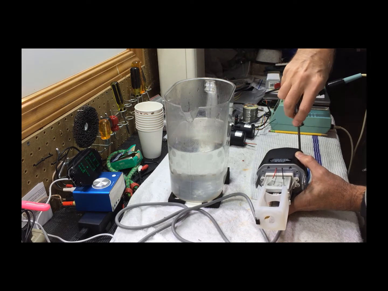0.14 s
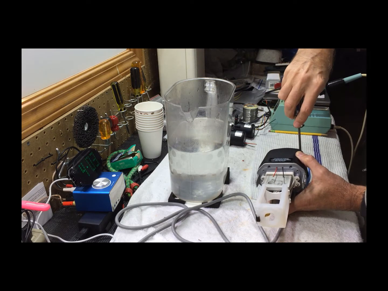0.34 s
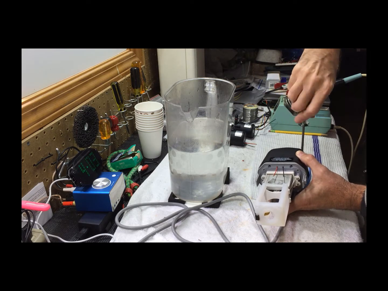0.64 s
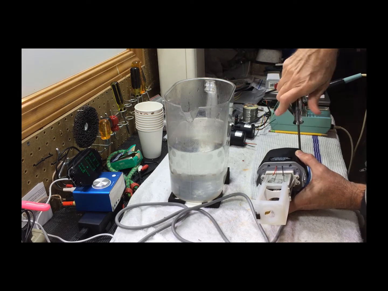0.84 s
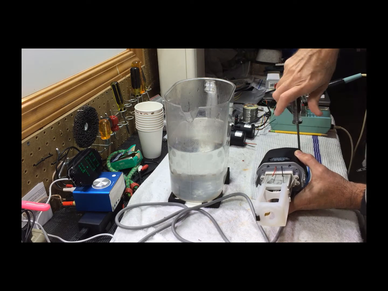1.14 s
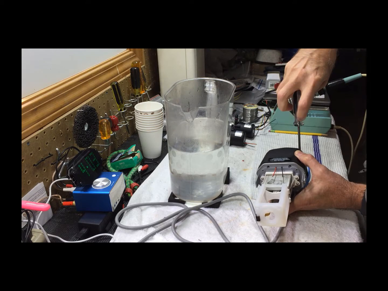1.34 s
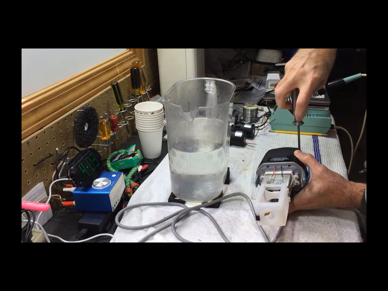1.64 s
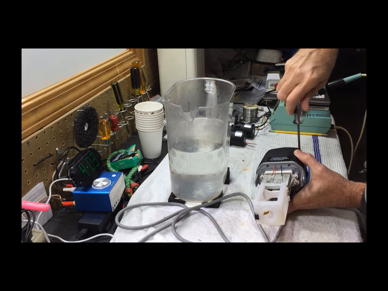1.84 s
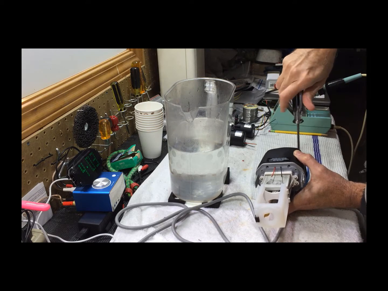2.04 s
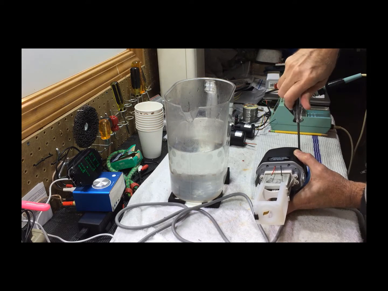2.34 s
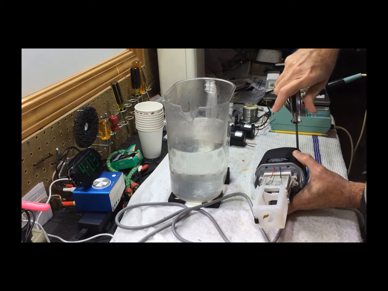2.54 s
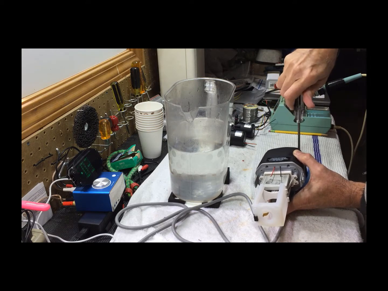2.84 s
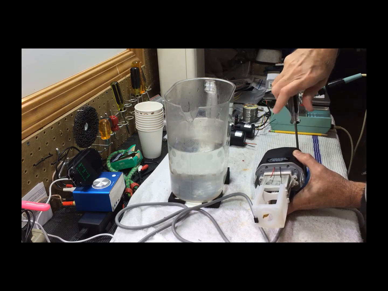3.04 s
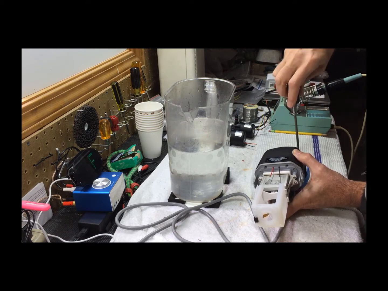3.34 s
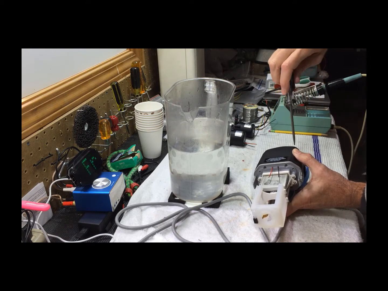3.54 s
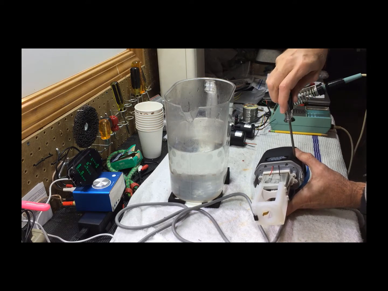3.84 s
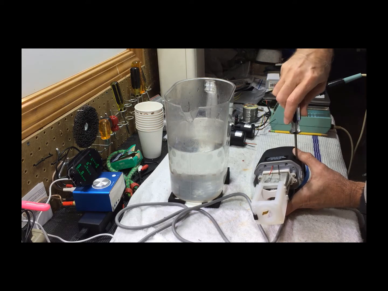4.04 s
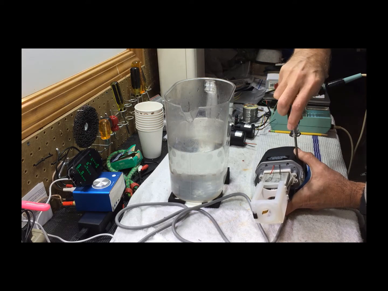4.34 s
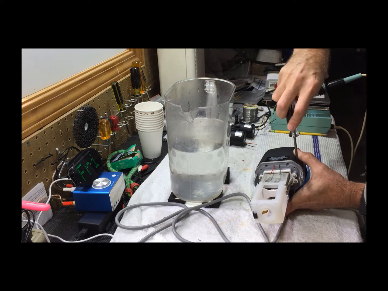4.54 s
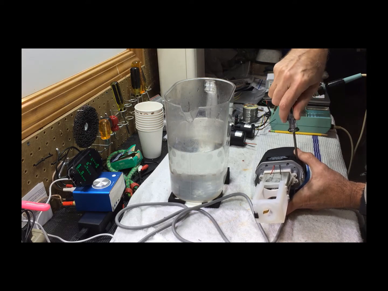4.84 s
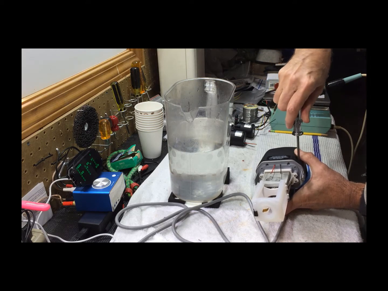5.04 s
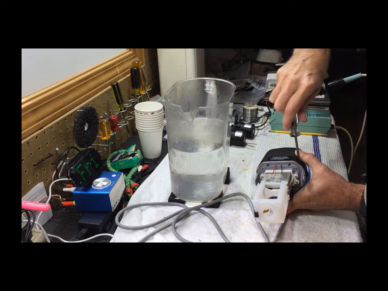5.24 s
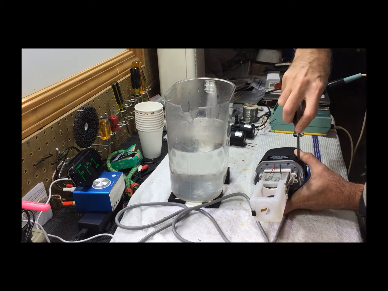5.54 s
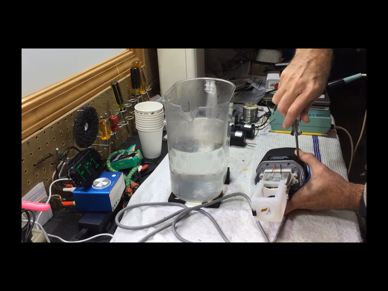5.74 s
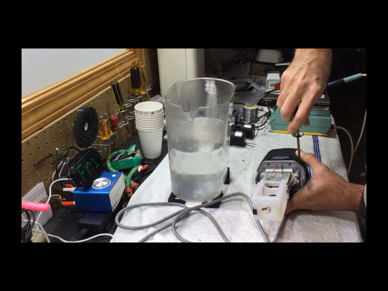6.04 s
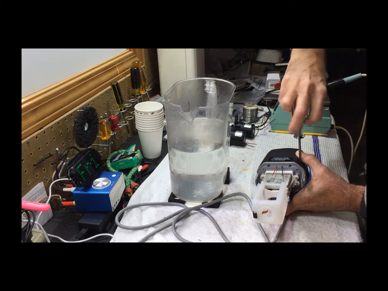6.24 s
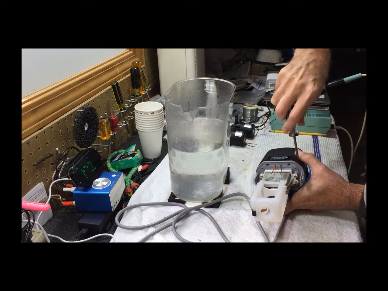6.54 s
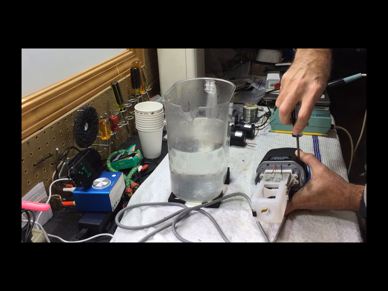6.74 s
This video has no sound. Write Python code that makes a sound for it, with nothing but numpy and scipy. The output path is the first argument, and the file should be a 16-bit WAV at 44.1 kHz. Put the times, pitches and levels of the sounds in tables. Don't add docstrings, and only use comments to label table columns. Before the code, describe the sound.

A small steel screwdriver works at screws in a hollow plastic housing held on a cloth-covered bench, close to the microphone. It opens at once with a short rub and crisp clicks, and a hard double knock at about 0.35 s, with smaller taps to 0.8 s. From 0.8 to 2.2 s only sparse, light plastic ticks. From 2.2 to 3.5 s a soft rub fades under denser rattling, with a firmer knock near 3.1 s. After a short lull, knocks cluster from 4.0 to 4.5 s, strongest at 4.25 s. Quiet again, then a rising scrape and the heavy clacks at 5.1 and 5.25 s, with smaller ones to 5.6 s. From 5.8 s a rub grows beneath uneven ticks and knocks, ending with a tap near 6.75 s. Sounds are dry and midrange with bright metallic edges, a short small-workshop echo, faint steady hiss and low rumble.

```python
import sys
import numpy as np
from scipy import signal
from scipy.fft import rfft, irfft
from scipy.io import wavfile

SR = 44100
rng = np.random.default_rng(int(sys.argv[2]) if len(sys.argv) > 2 else 0)


def persist_wave(psi):
    counts = np.round(np.clip(psi, -1, 1) * 32767).astype(np.int16)
    wavfile.write(sys.argv[1], SR, np.atleast_2d(counts).T)


def attenuation_scalar(level_db):
    decades = np.asarray(level_db, float) / 20
    return 10 ** decades


N = 303408

# pitch_hz, density_db
AIR_SPECTRUM = [(15, -31), (25, -57), (76, 2.5), (463, -5), (641, -9), (1840, -10.5), (9070, -19.5),
                (15300, -22.5)]
# time_s, level_db
AIR_LEVEL = [(0, -68), (1, -71.5), (2, -69.5), (3, -67), (3.8, -68.5), (4.7, -66.5), (5.8, -70), (6.9, -69)]
# time_s, level_db
RUMBLE_LEVEL = [(0, -78.5), (1.5, -81.5), (3.2, -78.5), (4.7, -76.5), (6.9, -77)]

# pitch_hz, level_db, t60_s
HOLLOW_MODES = [(493, -11, 0.097), (600, 0.5, 0.12), (635, 4, 0.045), (710, 0.5, 0.045)]
# pitch_hz, level_db, t60_s
WALL_MODES = [(888, -24.5, 0.072), (1094, -3.5, 0.054), (1210, -4.5, 0.086), (1465, -0.5, 0.03)]
# pitch_hz, level_db, t60_s
RIB_MODES = [(1467, -1, 0.02), (1628, 2.5, 0.029), (1697, 6, 0.036), (2004, 1.5, 0.02), (2210, -12, 0.03)]
# pitch_hz, level_db, t60_s
LONG_RIB_MODES = [(1930, -6, 0.044), (2600, -7.5, 0.029)]
# pitch_hz, level_db, t60_s
POST_MODES = [(2540, -5.5, 0.0031), (2760, 0, 0.02), (2950, 4, 0.0083), (3280, -3, 0.036),
              (4520, -8.5, 0.0098), (4164, -2.5, 0.051), ]
# pitch_hz, level_db, t60_s
STEEL_MODES = [(3370, 2, 0.014), (4640, -12.5, 0.0047), (5483, 0.5, 0.036), (6440, -1.5, 0.049),
               (7740, -8, 0.0036), (8720, -8.5, 0.098)]
# pitch_hz, level_db, t60_s
TIP_EDGE_MODES = [(10000, 0.19, 0.0065), (11800, 0.067, 0.018), (14450, -0.82, 0.0019)]
# pitch_hz, level_db, t60_s
BENCH_MODES = [(172, -19, 0.07), (243, -8.5, 0.062), (321, 1.5, 0.12)]

# start_s, end_s, start_db, end_db
RUBS = [
    (0, 0.047, -70, -54.5),
    (2.195, 3.42, -71.5, -91),
    (3.959, 4.17, -63.5, -61.5),
    (4.984, 5.256, -70.5, -52),
    (5.894, 6.613, -88, -64.5),
]
# start_s, level_db
TIP_CLICKS = [(0.0005, -50.5), (0.0291, -43), (0.3434, -63), (0.367, -43.5), (0.3693, -35), (0.607, -64),
              (0.618, -48), (0.6264, -51.5), (0.646, -58.5), (0.842, -69), (2.4344, -52), (2.5806, -48),
              (2.8, -57), (2.846, -48), (1.4735, -70), (3.006, -53.5), (1.577, -71), (3.1176, -70),
              (3.126, -43.5), (3.137, -55), (3.145, -52), (3.277, -50), (3.266, -63), (3.3744, -51),
              (3.413, -63), (3.424, -56), (3.441, -55), (3.461, -51), (3.476, -47.5), (3.4937, -56),
              (3.9738, -56.5), (3.984, -56), (4.1094, -48), (4.2525, -52.5), (2.009, -87),
                    (4.4441, -67), (4.4584, -63), (5.09, -44), (5.212, -55), (5.2206, -41.5), (5.224, -54),
                    (5.2718, -27.5), (5.5255, -58), (5.581, -57), (5.5875, -62), (5.948, -43),
                    (6.4155, -59), (5.9866, -68), (5.9987, -49), (6.024, -62), (6.2907, -57), (6.317, -61),
                    (6.308, -65), (6.3976, -47.5), (6.38, -64)]
# time_s, level_db
TIP_BITE = [(0, -9.5), (2, -1), (3.4, -1), (3.5, -51), (5, -8), (5.3, -8.5), (6.9, -23)]

# start_s, case_db, rattle_ms
CASE_KNOCKS = [(0.3429, -28.5, 9.3), (.3465, -54, 6.2), (.5287, -57, 3.8), (.5454, -57.5, 13),
               (0.6029, -35, 3.5), (1.1686, -43, 3.8), (1.321, -53.5, 2.5), (1.748, -59, 8.5),
               (2.2846, -52, 11.3), (4.2104, -45.5, 3.7), (4.2364, -46, 2.8), (4.9094, -57.5, 7.3),
               (6.3495, -53, 3), (6.4761, -52, 4), (6.506, -57, 6.5), (6.6044, -56.5, 7.3)]
# start_s, spot_db, case_db, rattle_ms
WALL_KNOCKS = [(.4766, -58, -52, 11.4), (.6444, -57, -55, 2.5), (.9194, -62, -63.5, 2.24),
               (1.075, -67.5, -66, 12), (1.401, -58, -61.5, 3), (2.0183, -58, -50.5, 11),
               (2.0366, -55.5, -48.5, 8.5), (2.4826, -68, -64, 19), (2.4885, -50, -52, 2.9),
               (3.1253, -47, -33, 2.7), (3.3432, -61, -61, 12), (3.9829, -42, -56.5, 9.6),
               (4.081, -56, -80, 18), (4.0906, -51.5, -58, 5.6), (4.1933, -48, -52, 0.48),
               (4.2542, -33, -38, 1.5), (4.4123, -55.5, -71, 7.4), (4.4591, -42, -39, 5.7),
               (5.2123, -41, -43, 7.8), (5.2185, -32.5, -60, 8.1), (5.4294, -47, -52, 3.5),
               (5.5795, -50, -49, 8), (6.0234, -47, -43.5, 4.4), (6.3011, -44.5, -54, 0.89),
               (6.3427, -52, -53, 2.3), (6.3691, -49.5, -45, 1.36), (6.5117, -51.5, -79, 12),
               (6.529, -44.5, -43.5, 6.5)]
# start_s, spot_db, case_db, rattle_ms
RIB_TICKS = [(.4985, -56.5, -52.5, 13), (1.1625, -53.5, -83, 6.8), (1.473, -46.5, -46, 1.9),
             (1.5961, -61, -55, 3), (1.7683, -49, -53.5, 5.7), (1.8545, -57, -55.5, 1.26),
             (2.0445, -60.5, -71, 3), (2.1466, -58, -61.5, 3.1), (2.312, -56, -58, 1.8),
             (2.5626, -47.5, -49, 2.35), (2.724, -56, -69, 1.8), (2.757, -51, -60, 4.4),
             (2.9818, -50.5, -57, 3.9), (3.0134, -62, -68, 6.8), (3.25, -47.5, -52.5, 15),
             (3.366, -60, -71, 2.2), (3.3724, -48.5, -51, 6.6), (3.4397, -42, -50, 6.9),
             (3.9744, -43, -54.5, 1.06), (4.1107, -35, -83, 5.3), (4.2051, -47, -43, 6.2),
             (4.4361, -48.5, -43, 14), (5.6753, -64, -51.5, 5), (5.95, -36.5, -54.5, 3.4),
             (6.29, -44.5, -41, 3.6), (6.3977, -51, -58, 8.6), (6.428, -51.5, -55, 1.6),
             (6.4476, -70, -58, 3.5), (6.553, -75, -56, 18), (6.6227, -73, -59.5, 13)]
# start_s, spot_db, case_db, rattle_ms
CORNER_KNOCKS = [(.0005, -40.5, -37, 3.8), (.7175, -51.5, -54, 2.7), (.7523, -59.5, -58, 3.6),
                 (.7925, -61, -60.5, 2.9), (1.5755, -55.5, -52, 1.66), (1.9105, -67, -61.5, 6.8),
                 (2.3617, -80, -62.5, 5.7), (2.4251, -58, -54.5, 2.3), (2.434, -51, -55.5, 1),
                 (2.5772, -46.5, -46, 14), (2.8431, -48.5, -39.5, 2.8), (3.0925, -50, -66, 15),
                 (4.0325, -55, -80, 3.5), (4.0585, -53, -63, 10.3), (4.427, -56, -54, 29),
                 (4.4441, -42.5, -61, 1.5), (4.9498, -58, -63, 7.5), (5.0762, -58, -47, 9.7),
                 (5.0904, -26, -27, 3.35), (5.5242, -42.5, -38, 6.5), (5.8416, -67, -58.5, 3.1),
                 (5.8641, -55, -50.5, 5.4), (5.969, -50, -66, 5.9), (5.9864, -42, -44.5, 3.2),
                 (5.9995, -40, -36.5, 4.46), (6.3093, -39.5, -49.5, 3.9), (6.4395, -57, -57, 4.8),
                 (6.5222, -56, -55, 3.2), (6.538, -52, -46, 1.78), (6.768, -41.5, -39, 1.83)]
# start_s, spot_db, case_db, rattle_ms
POST_TICKS = [(.0284, -30.5, -31, 2.15), (.3678, -28, -23.5, 3.36), (.5997, -50, -73, 5),
              (.6261, -56, -60, 6.7), (.7299, -70.5, -58.5, 10.5), (1.1991, -57.5, -74.5, 3.4),
              (1.6992, -62.5, -63, 3.4), (1.947, -65, -94, 5), (2.0066, -51.5, -53.5, 3.3),
              (2.2945, -49, -60.5, 2.5), (2.8008, -48, -62, 3.2), (2.826, -53, -49, 21.4),
              (3.0058, -56, -49, 5.6), (3.12, -51, -69, 7.7), (3.1375, -48, -74.5, 1.8),
              (3.1463, -54, -47.5, 3), (3.2776, -44.5, -42.5, 4.94), (3.3354, -58.5, -75, 3.9),
              (3.4263, -56, -67, 12), (3.4625, -41.5, -52, 2.6), (3.476, -47, -75, 5.7),
              (3.4922, -44, -56, 1.75), (3.509, -61, -82, 5.7), (5.0658, -61, -59, 11),
              (5.1991, -54, -55, 8.4), (5.224, -40.5, -38, 5.5), (5.2707, -31.5, -36, 5.2),
              (5.2675, -42.5, -60, 2.94), (5.5862, -49, -57, 6.6), (5.8297, -57, -69, 2.3)]
# walls_db, ribs_db, posts_db, long_rib_db, steel_db
CASE_SHARES = (-11.5, -10, -18, -39.5, -30)
# walls_db, ribs_db, posts_db, long_rib_db, steel_db
WALL_SHARES = (-1.2, -2, -10.5, -52, -26.5)
# walls_db, ribs_db, posts_db, long_rib_db, steel_db
RIB_SHARES = (-9.5, -3, -6, -1.5, -23)
# walls_db, ribs_db, posts_db, long_rib_db, steel_db
CORNER_SHARES = (0.8, -3.5, -9.5, -0.5, -18)
# walls_db, ribs_db, posts_db, long_rib_db, steel_db
POST_SHARES = (-1, -0.5, 0.5, -29, -15.5)

# start_s, pitch_hz, level_db
CASE_NOTES = [(0.0005, 970, -37), (0.001, 680, -58), (0.031, 630, -34), (0.0314, 1227, -30.5),
              (0.3529, 604, -31), (0.3673, 974, -24), (0.3673, 1215, -21.5), (0.4534, 980, -47.5),
              (0.6426, 927, -48), (1.5772, 966, -49.5), (2.3139, 720, -47), (2.4881, 1117, -42.5),
              (2.5826, 705, -37), (2.5909, 1260, -47.5), (2.8074, 1103, -41), (2.844, 1284, -38.5),
              (2.8482, 710, -47), (3.0955, 1230, -44), (3.2526, 1120, -46.5), (3.3248, 1230, -52),
              (3.378, 600, -37), (3.4752, 1260, -42.5), (3.4988, 1270, -53), (4.0603, 1110, -45),
              (4.082, 1050, -45), (4.0952, 1110, -45), (4.1116, 1240, -43), (4.1974, 1060, -42),
              (4.2957, 765, -51), (4.4426, 730, -33.5), (4.4431, 1097, -43), (4.4605, 668, -35),
              (4.4638, 1077, -35), (4.9107, 582, -42.5), (5.0931, 1030, -41), (5.2243, 1110, -23),
              (5.2742, 1185, -33), (5.3178, 714, -55), (5.4294, 740, -47), (5.5873, 747, -40.5),
              (5.8662, 744, -46.5), (5.95, 730, -42.5), (6.0074, 1066, -38), (6.0392, 1044, -45),
              (6.0409, 650, -47), (6.2908, 1265, -37), (6.3006, 716, -40.5), (6.3511, 660, -35),
              (6.3683, 1080, -43), (6.4082, 755, -51), (6.5419, 1026, -39)]
# start_s, pitch_hz, level_db
RIB_NOTES = [(0.0005, 1960, -30.5), (0.0272, 1614, -25.5), (0.0658, 1610, -36.5), (0.1273, 1690, -51),
             (0.1468, 1920, -49), (0.1745, 1630, -49.5), (0.3421, 1570, -49), (0.4052, 1600, -37),
             (0.4461, 1390, -46), (0.4532, 1660, -45), (0.5054, 1680, -50), (0.6288, 2050, -44),
             (1.199, 1810, -50.5), (1.5757, 2010, -60), (1.8543, 1950, -40.5), (2.0459, 1745, -41.5),
             (2.294, 1950, -49), (2.4323, 1470, -44), (2.4329, 1980, -43.5), (2.5775, 1770, -45),
             (2.7583, 1760, -41.5), (2.8412, 2034, -37.5), (2.8715, 1470, -49), (2.9822, 1830, -44.5),
             (3.125, 1930, -39), (3.1309, 2240, -42), (3.2507, 1780, -42), (3.2797, 1600, -58),
             (3.3731, 2050, -35.5), (3.4411, 1830, -37), (3.4781, 1750, -39), (3.974, 1640, -39),
             (3.9842, 1420, -51), (4.1095, 1790, -34.5), (4.2059, 2020, -40), (4.2872, 1620, -48),
             (4.4435, 1395, -34), (5.0894, 2070, -36), (5.0899, 1570, -34), (5.1665, 1650, -53),
             (5.2191, 1450, -26.5), (5.2231, 1880, -36), (5.2904, 1660, -30), (5.4289, 1520, -51),
             (5.5335, 2010, -53), (5.5807, 2020, -50), (5.8646, 1590, -48), (5.8651, 1910, -47),
             (5.9984, 1885, -39), (6.2911, 1540, -38.5), (6.3129, 1580, -38), (6.5385, 2004, -42),
             (6.6009, 1870, -52), (6.7674, 2050, -39)]
# start_s, pitch_hz, level_db
POST_NOTES = [(0.0005, 2500, -42), (0.0264, 3980, -37), (0.0267, 4670, -35), (0.0271, 3620, -47),
              (0.0285, 2590, -26), (0.0833, 2460, -51), (0.3668, 6700, -52), (0.3671, 3440, -38),
              (0.368, 2500, -23), (0.3681, 4940, -37), (0.3701, 7520, -41), (0.3701, 7840, -51),
              (1.4725, 2500, -50), (1.7671, 3200, -43), (2.0441, 2660, -41.5), (2.4326, 6260, -42),
              (2.5797, 2200, -56), (2.8, 2720, -38.5), (2.8, 2900, -35.5), (2.8444, 6050, -44),
              (3.1237, 2790, -37.5), (3.1248, 8420, -45), (3.125, 8680, -48), (3.1298, 3050, -36.5),
              (3.2488, 2860, -43), (3.4504, 2330, -45), (3.4757, 2760, -32.5), (3.4758, 4300, -38),
              (3.4762, 4050, -35), (3.478, 2280, -41), (3.9736, 3030, -41), (3.974, 3990, -42.5),
              (4.1104, 5760, -50), (4.1246, 2880, -33.5), (4.1935, 2620, -46), (4.2521, 4110, -40),
              (4.2522, 4460, -46), (4.2549, 2720, -35.5), (4.4616, 2650, -49), (5.0886, 3740, -28.5),
              (5.0896, 6960, -43), (5.0898, 5300, -43), (5.2199, 4660, -31), (5.2225, 7100, -41),
              (5.2227, 2340, -37), (5.2322, 2700, -53), (5.2702, 5260, -23.5), (5.2705, 4590, -23.5),
              (5.2717, 7200, -40), (5.2723, 8350, -35), (5.2811, 2660, -42), (5.9503, 3820, -34.5),
              (5.9511, 5780, -42), (6.0002, 4570, -41), (6.2913, 3960, -45.5), (6.7663, 3810, -42.5)]
# start_s, pitch_hz, level_db
DEAD_BLOWS = [
    (.3685, 1550, -16),
    (3.1258, 1130, -21.5),
    (4.2538, 1350, -24.5),
    (5.0902, 825, -22),
    (6.2908, 1800, -26),
    (6.7672, 860, -34),
]
# start_s, peak_db
ROCKING = [(0.024, -42), (0.345, -49), (0.366, -41), (3.127, -45.5), (2.58, -52.5), (3.482, -47.5),
           (3.981, -47.5), (4.058, -50.5), (4.112, -46), (5.091, -51), (5.271, -42), (6, -46), (6.534, -59),
           (.604, -56.5), (6.306, -59.5)]
# pitch_hz, early_t60_s, early_db, late_t60_s, late_db
WORKSHOP_ECHO = [(497, 0.14, -5, 0.5, -21), (1296, 0.15, -3.5, 1, -25.5), (2820, 0.061, -1, 0.53, -14),
                 (6000, 0.15, -8.5, 0.41, -22), (11900, 0.043, -2.5, 0.27, -32.5)]


def rms_one(x):
    return x / np.sqrt(np.mean(x ** 2) + 1e-20)


def in_time(rows):
    return np.interp(np.arange(N) / SR, *np.transpose(rows))


def band(x, low_hz, high_hz):
    sos = signal.butter(2, [low_hz, min(high_hz, 0.45 * SR)], "band", fs=SR, output="sos")
    return signal.sosfilt(sos, x)


def drift(rate_hz):
    steps = rng.standard_normal(400)
    return np.interp(np.arange(N) / SR * rate_hz, np.arange(400), steps)


def lay(times_s, sounds):
    out = np.zeros(N + SR)
    for start_s, sound in zip(times_s, sounds):
        first = round(start_s * SR)
        out[first:first + len(sound)] += sound
    return out[:N]


def snap(t_s):
    snap_db, snap_t60_s = 5.0, 0.018
    return 1 + attenuation_scalar(snap_db - 60 * t_s / snap_t60_s)


def body(modes, spread_db, scatter, count, size):
    full = SR // 14
    longest_t60_s = np.max(modes, axis=0)[2]
    t_s = np.arange(min(full, max(500, int(longest_t60_s * SR)))) / SR
    hz, level_db, t60_s = np.repeat(modes, size, axis=0).T[:, :, None]
    luck = rng.standard_normal((count, len(hz), 3))
    turns = hz * (1 + scatter * luck[:, :, 1:2]) * t_s
    fade = attenuation_scalar(level_db + spread_db * luck[:, :, :1] - 60 * t_s / t60_s)
    partials = fade * np.sign(luck[:, :, 2:]) * np.sin(2 * np.pi * turns)
    rings = partials.sum(axis=1) * snap(t_s)
    rings = np.pad(rings, ((0, 0), (0, full - len(t_s))))
    return rings / np.sqrt(np.mean(rings[:, :350] ** 2, axis=1, keepdims=True))


def rattle(length_ms, size):
    t_ms = np.arange(1000) * 1000 / SR
    luck = rng.random((len(length_ms), 1000, 2))
    hits = (luck[:, :, 0] < 0.08) * (2 * luck[:, :, 1] - 1)
    bounces = hits * np.exp(-(t_ms / (1.8 * length_ms)) ** 2) * 0.48
    bounces *= np.clip(length_ms / 7.3, 0, 4)
    bounces[:, size] = 1
    bounces[:, :size] *= np.arange(size) / size
    return bounces / np.sqrt(np.sum(bounces[:, :300] ** 2, axis=1, keepdims=True))


def struck(times_s, rings, length_ms, blur, size):
    rattled = signal.fftconvolve(rings, rattle(length_ms, size), axes=1)
    near = lay(np.maximum(times_s - size / SR, 0), rattled)
    short = rings[:, :500] * np.exp(-np.arange(500) / blur)
    short *= np.sqrt(np.sum(rings ** 2, axis=1) / np.sum(short ** 2, axis=1))[:, None]
    return np.array([near, lay(times_s + length_ms[:, 0] / 3000, short)])


def air():
    hz = np.arange(N // 2 + 1) * SR / N + 1
    point_hz, point_db = np.transpose(AIR_SPECTRUM)
    port_dip_db = -5.5 * np.exp(-((hz - 10350) / 330) ** 2)
    colour = attenuation_scalar(np.interp(np.log(hz), np.log(point_hz), point_db) + port_dip_db)
    colour *= hz < 15350
    hiss = irfft(rfft(rng.standard_normal(N)) * colour, N)
    return attenuation_scalar(in_time(AIR_LEVEL)) * rms_one(hiss)


def rumble():
    machine = band(rng.standard_normal(N), 45, 71.7)
    traffic = band(rng.standard_normal(N), 53, 130)
    return attenuation_scalar(in_time(RUMBLE_LEVEL) + 2.8 * drift(5.0)) * rms_one(machine + 0.14 * traffic)


def rubbing():
    let_go_db_per_s = 80.5
    sizes = attenuation_scalar(2.1 * np.minimum(rng.exponential(1, N), 4)) * rng.choice([-1, 1], N)
    chance = rng.random(N)
    slips_per_s = 2500 * attenuation_scalar(4.0 * drift(30))
    slips = sizes * (chance < slips_per_s / SR)
    parts = ((HOLLOW_MODES, -3), (WALL_MODES, -3), (RIB_MODES, -2), (POST_MODES, -6), (STEEL_MODES, -14))
    ring = sum(attenuation_scalar(db) * body(modes, 0.33, 0.037, count=1, size=3)[0] for modes, db in parts)
    t_s = np.arange(N) / SR
    press = np.zeros(N)
    for start_s, end_s, start_db, end_db in RUBS:
        level_db = np.interp(t_s, [start_s, end_s], [start_db, end_db])
        level_db = level_db - let_go_db_per_s * np.maximum(t_s - end_s, 0)
        press += attenuation_scalar(level_db) * (t_s >= start_s)
    return press * attenuation_scalar(-4.0) * rms_one(signal.fftconvolve(slips, ring)[:N])


def tip_clicks():
    held_t60_s = 0.09
    start_s, level_db = np.transpose(TIP_CLICKS)
    count = len(start_s)
    rings = body(STEEL_MODES, 1.5, 0.06, count=count, size=8)
    rings *= attenuation_scalar(1.5 - 60 * np.arange(rings.shape[1]) / SR / held_t60_s)
    bite_db = np.interp(start_s, *np.transpose(TIP_BITE))
    rings += attenuation_scalar(bite_db)[:, None] * body(TIP_EDGE_MODES, 3.7, 0.16, count=count, size=8)
    rings = attenuation_scalar(level_db - 2.5)[:, None] * rings
    return struck(start_s, rings, np.full((count, 1), 5.5), blur=14, size=160)


def contacts():
    case_knocks = [(s, db, db, ms) for s, db, ms in CASE_KNOCKS]
    spots = [(case_knocks, CASE_SHARES), (WALL_KNOCKS, WALL_SHARES), (RIB_TICKS, RIB_SHARES),
             (CORNER_KNOCKS, CORNER_SHARES), (POST_TICKS, POST_SHARES)]
    rows = np.array([(s, ms, case_db, *np.add(spot_db, shares))
                     for table, shares in spots for s, spot_db, case_db, ms in table])
    count = len(rows)
    hollow_db, walls_db, ribs_db, posts_db, long_rib_db, steel_db = rows[:, 2:].T[:, :, None] - 3.5
    rings = attenuation_scalar(hollow_db) * body(HOLLOW_MODES, 3.34, 0.012, count, size=1)
    rings += attenuation_scalar(walls_db) * body(WALL_MODES, 5.2, 0.03, count, size=2)
    rings += attenuation_scalar(ribs_db) * body(RIB_MODES, 1.2, 0.0091, count, size=2)
    rings += attenuation_scalar(posts_db) * body(POST_MODES, 2.9, 0.036, count, size=3)
    rings += attenuation_scalar(long_rib_db) * body(LONG_RIB_MODES, 1.4, 0.032, count, size=1)
    rings += attenuation_scalar(steel_db) * body(STEEL_MODES, 1.2, 0.066, count, size=2)
    return struck(rows[:, 0], rings, rows[:, 1:2], blur=49, size=45)


def notes(table, t60_s):
    rise_s, gain_db = 0.00082, 0.82
    t_s = np.arange(SR // 10) / SR
    start_s, hz, level_db = np.transpose(table)
    swell = 1 - np.exp(-t_s / rise_s)
    rings = attenuation_scalar(level_db + gain_db)[:, None] * swell * np.sin(2 * np.pi * hz[:, None] * t_s)
    near = lay(start_s, rings * attenuation_scalar(-60 * t_s / t60_s))
    return np.array([near, lay(start_s, rings * attenuation_scalar(-120 * t_s / t60_s))])


def rocking():
    start_s, peak_db = np.transpose(ROCKING)
    rings = attenuation_scalar(peak_db - 4.0)[:, None] * body(BENCH_MODES, 2.5, 0.03, count=len(start_s), size=1)
    soft_start = np.clip(np.arange(rings.shape[1]) / 200, 0, 1)
    return lay(start_s, rings * soft_start)


def workshop(x):
    t_s = np.arange(SR // 2) / SR
    white = rng.standard_normal((len(WORKSHOP_ECHO), len(t_s)))
    echo = np.zeros(len(t_s))
    for noise, (hz, early_t60_s, early_db, late_t60_s, late_db) in zip(white, WORKSHOP_ECHO):
        early = attenuation_scalar(early_db - 60 * t_s / early_t60_s) / np.sqrt(early_t60_s)
        late = attenuation_scalar(late_db - 60 * t_s / late_t60_s) / np.sqrt(late_t60_s)
        echo += band(noise, hz / 1.86, hz * 1.63) * (early + late)
    echo *= np.clip(t_s / 0.012, 0, 1) * np.sqrt(14 / SR)
    return signal.fftconvolve(x, echo)[:N]


def scene():
    sung = notes(CASE_NOTES, t60_s=0.05) + notes(RIB_NOTES, t60_s=0.036)
    sung += notes(POST_NOTES, t60_s=0.028) + notes(DEAD_BLOWS, t60_s=0.014)
    housing = contacts() + tip_clicks() + rubbing() + sung
    small_body = signal.butter(8, 465, "high", fs=SR, output="sos")
    near, spread = signal.sosfilt(small_body, housing) + rocking()
    return (near + workshop(spread) + air() + rumble())[None]


def roll_off(x):
    return signal.sosfilt(signal.butter(12, 16480, fs=SR, output="sos"), x)


def record(dry):
    top_cut = signal.cheby2(12, 60, 16500, fs=SR, output="sos")
    mix = signal.sosfilt(top_cut, dry)
    return roll_off(mix)


dry = scene()
out = record(dry)
persist_wave(out)
```